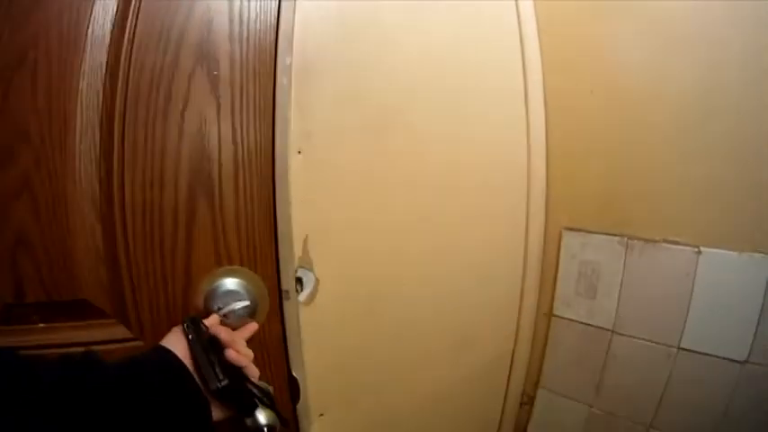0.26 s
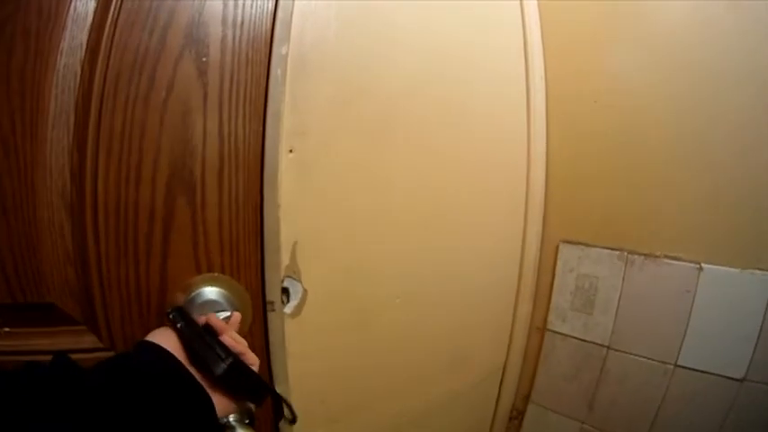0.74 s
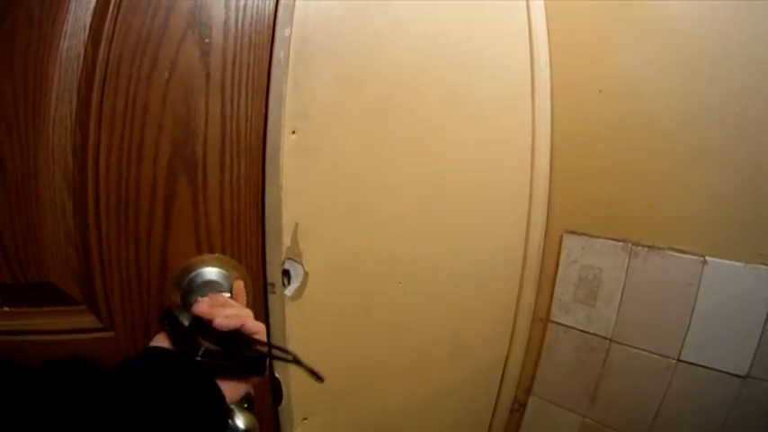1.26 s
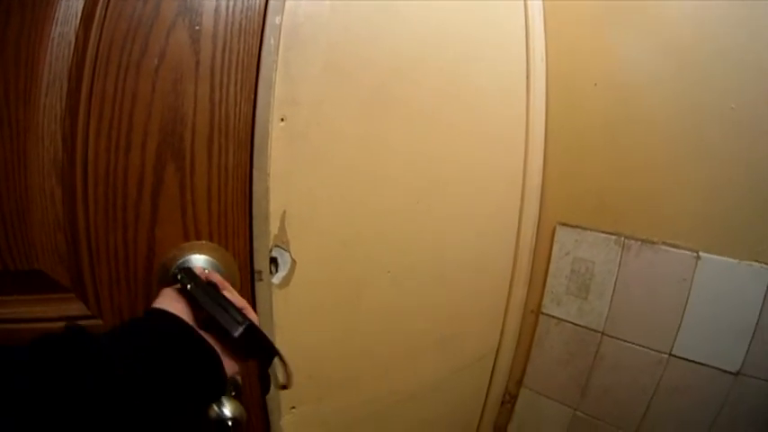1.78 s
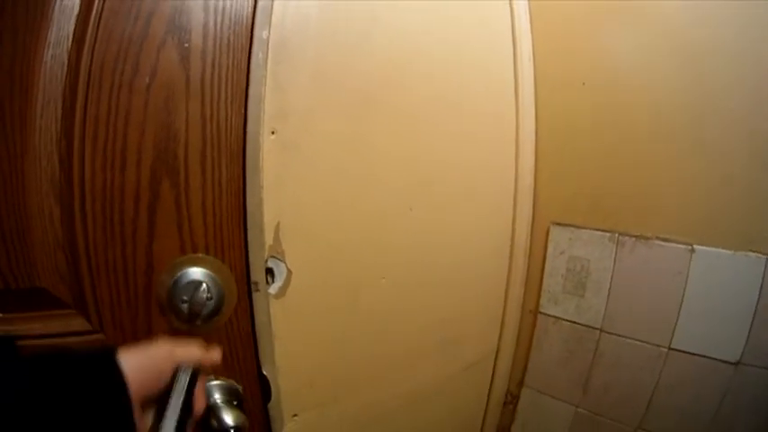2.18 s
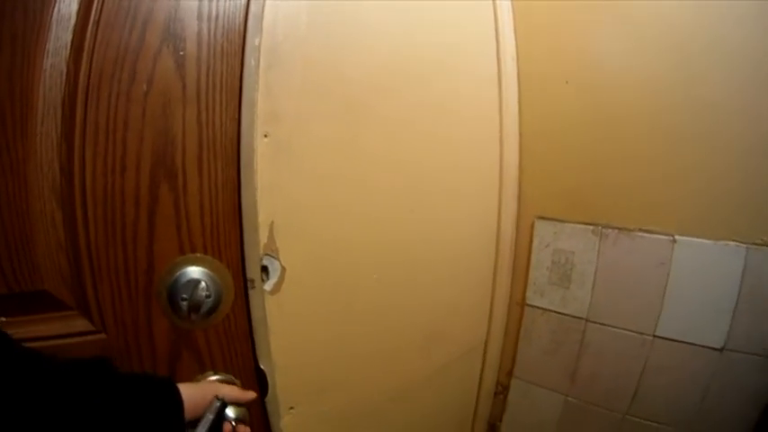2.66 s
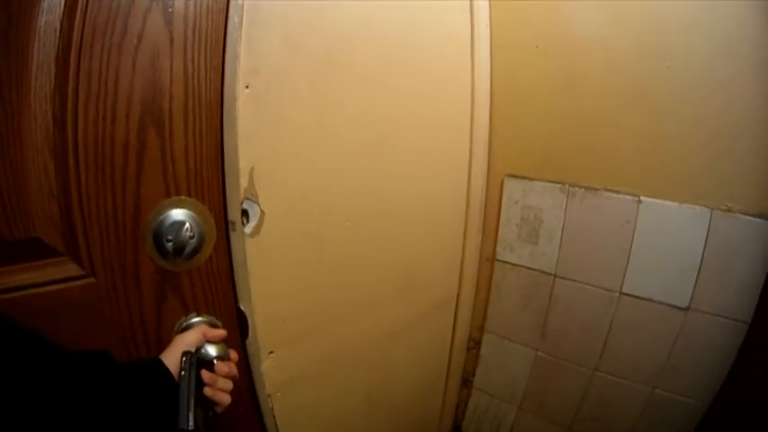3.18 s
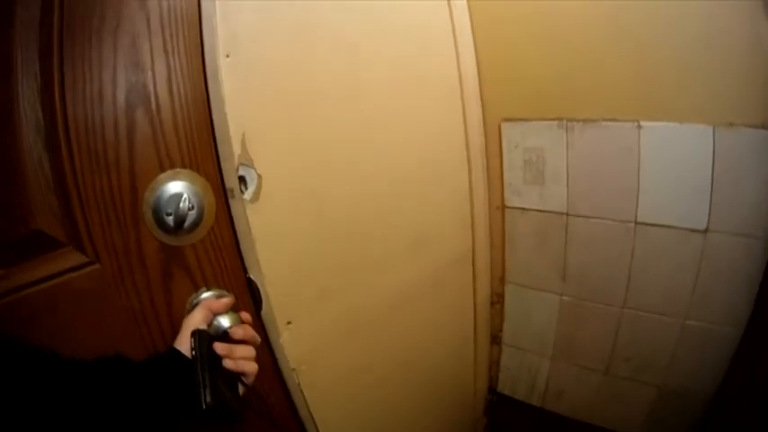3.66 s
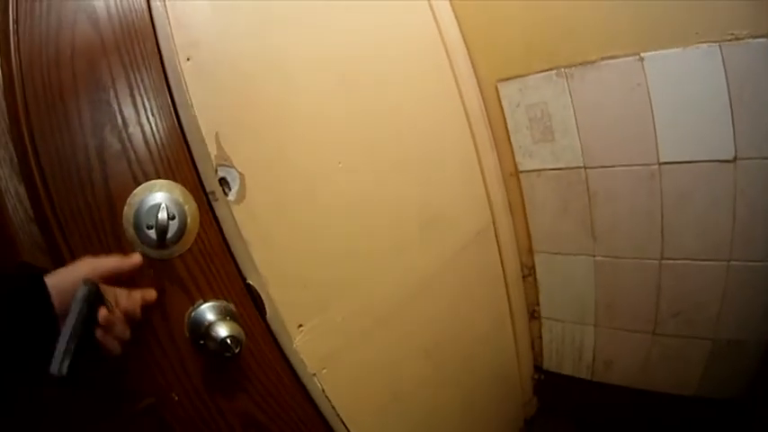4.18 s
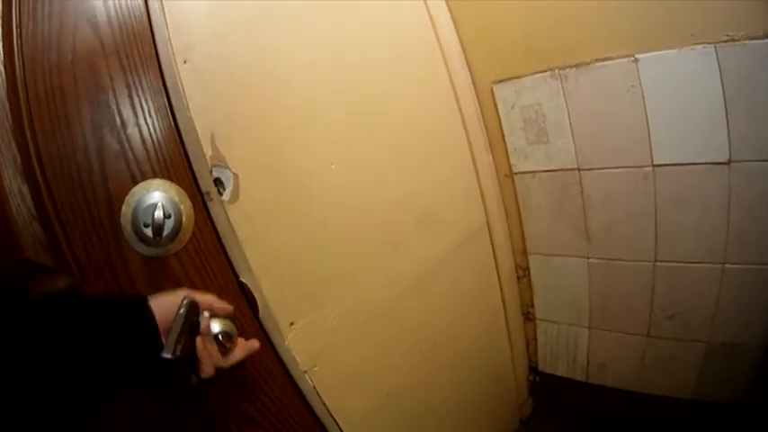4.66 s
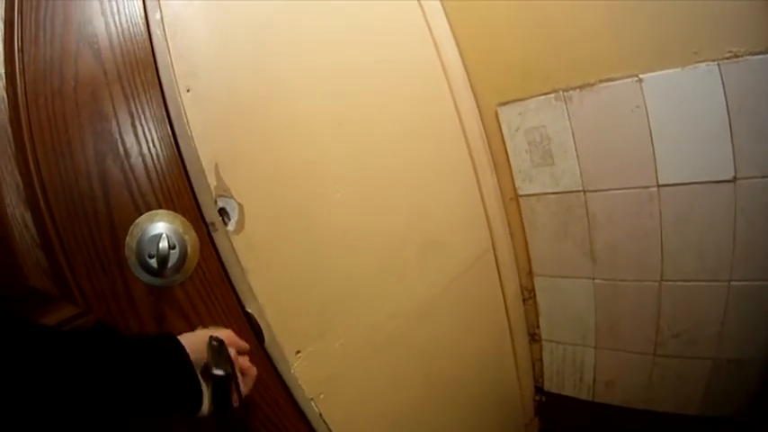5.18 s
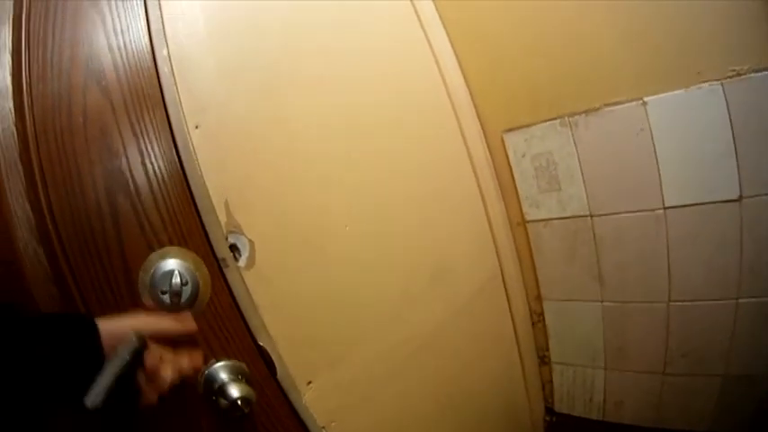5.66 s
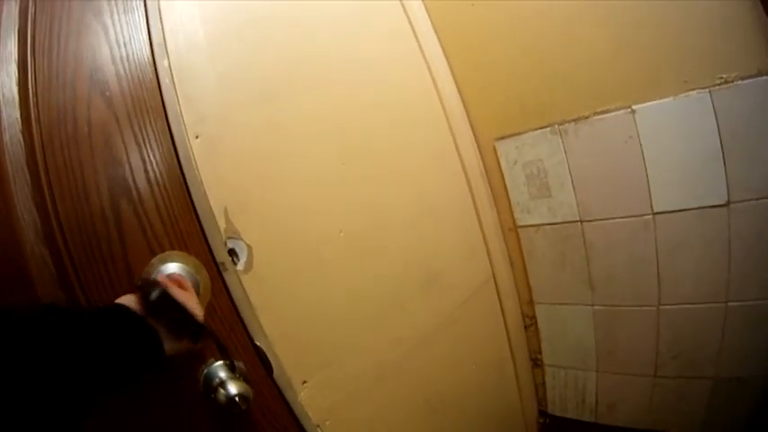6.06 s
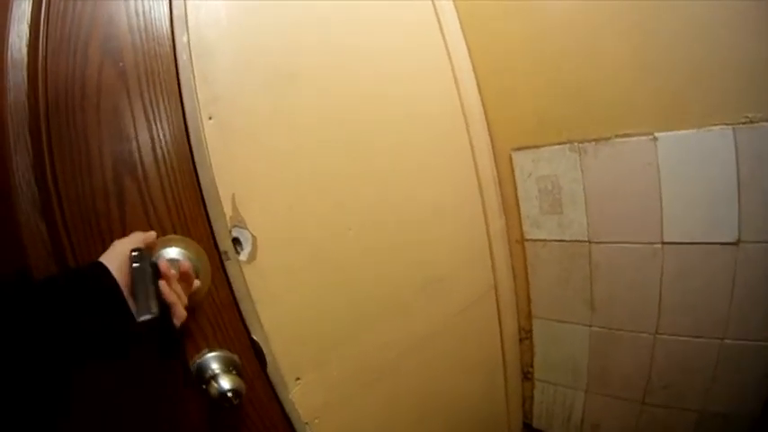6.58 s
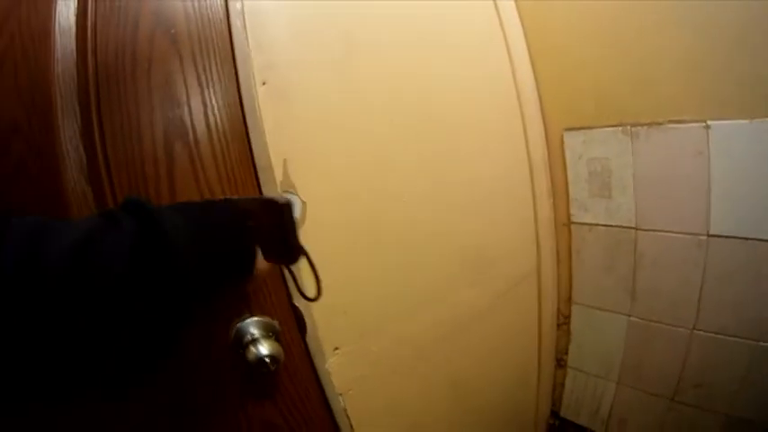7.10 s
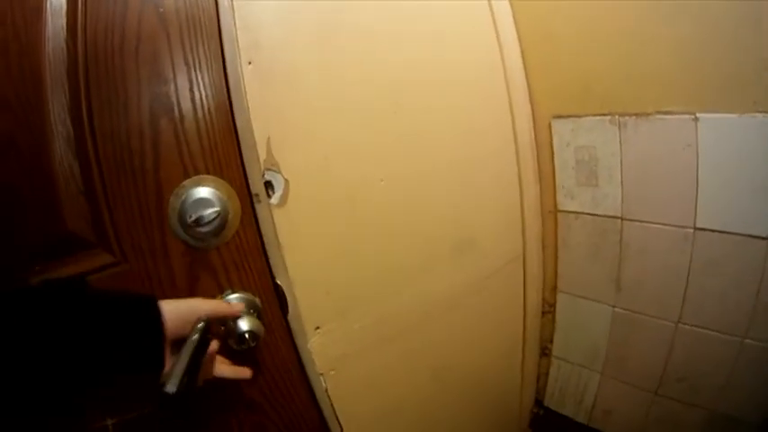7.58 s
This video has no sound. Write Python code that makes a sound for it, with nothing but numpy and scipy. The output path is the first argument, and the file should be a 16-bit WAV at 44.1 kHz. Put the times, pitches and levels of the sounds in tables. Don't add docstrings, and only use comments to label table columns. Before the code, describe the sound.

Metal lock parts tick, then clatter heavily against a wooden door. The doorknob follows with dull knocks and loose rattles, separated by quiet rubbing of hand, sleeve and strap. Small key clicks and scrapes lead to the loudest, sharp bolt snap, then a final knob clack. Short tile echoes, faint building rumble, a cheap close microphone with harsh, grainy treble.

```python
import sys
import numpy as np
from scipy import signal
from scipy.fft import rfft, irfft, next_fast_len
from scipy.io import wavfile
from scipy.ndimage import uniform_filter1d

SR = 44100
rng = np.random.default_rng(int(sys.argv[2]) if len(sys.argv) > 2 else 0)


def field_ratio(decibels):
    return 10 ** (np.asarray(decibels, dtype=float) / 20)


def to_wav(sig):
    pcm = np.clip(np.atleast_2d(sig), -1, 1) * 32767
    pcm = np.round(pcm).astype(np.int16)
    wavfile.write(sys.argv[1], SR, pcm.T)


N = 345303

# t/s, f/Hz, level/dB
MOTOR = [
    (0, 103, -56),
    (.5, 112, -53),
    (1.0, 116.5, -52.5),
    (1.15, 118, -46),
    (1.65, 122, -53.5),
    (1.9, 126, -75),
]
# t/s, level/dB
BUILDING = [(0, -42.5), (.2, -46), (.61, -42), (1.0, -44.5), (1.35, -43), (1.6, -43), (1.95, -40),
            (2.25, -45.5), (2.77, -42.5), (3.6, -43), (4.35, -43.5), (5.0, -43), (5.35, -44.5),
            (5.8, -41.5), (6.15, -40.5), (6.4, -42), (6.9, -39), (7.54, -42), (7.83, -41.5)]
# t/s, push on the leaf level/dB, hand and sleeve level/dB
HANDLING = [(0, -53, -42.5), (.17, -57.5, -53), (.5, -50, -45.5), (.76, -56.5, -55.5), (1.4, -56, -57),
            (2.11, -51.5, -50.5), (2.28, -58, -57), (2.9, -50.5, -51), (3.5, -50, -53.5), (4.4, -58, -56.5),
            (5.0, -51, -55), (5.3, -47.5, -54), (5.45, -56.5, -56.5), (6.001, -58.5, -56.5),
            (6.35, -51, -49.5), (6.65, -61, -59.5), (6.85, -51.5, -49.5), (7.3, -59, -59)]
# f/Hz, density/dB
RUMBLE_SPECTRUM = [(12, -38), (18, -5), (26, 3), (36, -4.5), (77, -1.5), (110, -13), (200, -25.5),
                   (400, -48.5)]
CREAK_SPECTRUM = [(100, -18.5), (200, 3.5), (300, 4.5), (500, 0.5), (900, -11.5), (1600, -32)]
RUSTLE_SPECTRUM = [(300, -4.5), (700, -2.5), (1040, -2.5), (1300, 1), (1640, -6.5), (2600, -9), (4500, -13),
                   (7000, -8.5)]
# level below the contact/dB, time to the top/s
LEAF_SHAKE = (-9, 0.027)
TRIM_SHAKE = (-18, 0.04)
WALL_SHAKE = (-15, 0.056)
# f/Hz, density/dB
STRAP_SPECTRUM = [(900, -33), (1210, -15), (1290, 9), (1380, -16), (1900, -14)]
# t/s, length/s, level/dB
STRAP_RUBS = [
    (-.1, 0.3, -62),
    (.3, 0.68, -74),
    (1.85, 0.64, -67),
    (2.7, 0.78, -78),
    (5.13, 0.2, -59),
    (6.1, 0.25, -65),
    (6.7, 0.29, -63),
]
# f/Hz, density/dB
SCRAPE_SPECTRUM = [(1500, -22), (2200, 4), (3300, 0), (4200, -7), (5000, 7), (5600, 4), (7000, -17)]
# t/s, length/s, level/dB
SCRAPES = [
    (6.207, 0.07, -55.5),
    (6.716, 0.256, -58),
]
# t/s, length/s, f/Hz, level/dB
SQUEAKS = [
    (.338, .024, 4880, -54),
    (.416, .015, 4830, -47),
    (.429, .03, 4860, -53),
    (7.65, .028, 1185, -58),
]
# f/Hz, t60/s
HALL_DECAY = [(100, 0.32), (400, 0.47), (1200, 0.24), (3000, 0.21), (6000, 0.23)]
# f/Hz, level/dB, t60/s
DOOR_MODES = [(76, 1, 0.062), (120, -13, 0.23), (155.4, -7.5, 0.6), (214, -2.5, 0.27), (278.2, 3.5, 0.048),
              (307.7, -5, 0.16), (365, -12.5, 0.28), (402.2, -4.5, 0.17), (500, -11.5, 0.15),
              (579, -10, 0.13)]
# low f/Hz, high f/Hz, hump f/Hz, hump width/Hz, hump level/dB
LOCK_CASE = (1360, 2780, 2100, 380, 4.7)
PINS = (2570, 7700, 4320, 1760, 2.6)
KNOB = (437, 1390, 720, 290, 1.6)
# f/Hz, width/Hz, level/dB
PLATE_MODES = [(958, 60, -6.5), (1131, 41, -6.5), (1406, 35, -3.5), (1992, 39, -7), (2425, 70, -4.5),
               (2730, 82, -11.5), (3380, 79, -16.5), (4330, 87, -12.5), (4740, 71, -16.5)]
# t/s, blow level/dB, door thump level/dB, brightness/dB
FIRST_TURN = [(.001, -71, -64, -3), (.4174, -53.5, -72, 6.5), (.5012, -49.5, -47, -12),
              (.5328, -59, -63, -8), (.5745, -44, -63, -5), (.6764, -50.5, -53.5, -4.5),
              (.842, -58, -51.5, -11.5), (1.2843, -54, -66, -9.5), (1.4085, -50.5, -71, -1.5),
              (1.454, -53, -46.5, -2), (1.5143, -54, -39, -6), (1.5314, -33.5, -40.5, -3.5),
              (1.6429, -32, -64, -3.5), (1.6698, -50, -32, -17.5), (1.7647, -30, -25, 0),
              (1.7776, -25.5, -23.5, -1), (1.7933, -26, -32, 0.8), (1.8101, -44, -35, 6),
              (2.0753, -48, -68, -6.5)]
# t/s, blow level/dB, door thump level/dB, brightness/dB
KNOB_STOPS = [(2.461, -53, -42, -15), (2.6029, -32, -31, -7.5), (2.7496, -41.5, -30, -10),
              (2.8498, -52.5, -48, -6), (2.9063, -57.5, -42, 3.5), (2.9485, -64, -39.5, -12),
              (3.23, -61, -47, -3), (3.582, -56.5, -51, -6), (3.8567, -37.5, -46.5, -6),
              (3.8797, -43.5, -41.5, -4), (4.513, -40, -40.5, -6.5), (4.5975, -59, -57, -6),
              (4.6156, -54.5, -46, -5), (4.8478, -47.5, -37, -10), (4.8975, -46.5, -34, -5.5),
              (5.006, -61, -56, -6), (5.0174, -60, -41, -1), (5.5289, -45, -49, -5),
              (5.5405, -38, -36.5, -8.5), (7.753, -30.5, -29.5, -3), (7.785, -51, -33, 6.5)]
# t/s, blow level/dB, door thump level/dB, brightness/dB
SECOND_TURN = [(6.098, -54.5, -52, -4.5), (6.1691, -50.5, -53, -7), (6.302, -41, -69, 0.5),
               (6.3253, -38.5, -54, 0), (6.443, -64, -61, -12), (6.544, -45.5, -56, -0.5),
               (6.6296, -57, -57, -9), (6.745, -57.5, -59, -10), (6.8766, -62, -34.5, -1),
               (6.9506, -32, -52, -1), (6.972, -35, -33, 4), (7.0157, -34, -25, 3.5),
               (7.0258, -20.5, -27, 2.5), (7.045, -35, -29, -11.5), (7.3176, -60, -54.5, -3)]
# t/s, blow level/dB, door thump level/dB, brightness/dB
SLIDES = [
    (.402, -48, -60, -7.5),
    (2.6193, -43, -29.5, -6),
    (3.724, -53, -63, 0.5),
    (4.954, -50.5, -50, -11),
    (5.4984, -52, -46, -2),
    (6.343, -63, -53, 10),
    (7.349, -56.5, -54, -2.5),
]
# t/s, blow level/dB, door thump level/dB, brightness/dB
NUDGES = [
    (.036, -56, -42, -14.5),
    (1.598, -42.5, -45, -2),
    (3.99, -49.5, -40, -6),
    (4.71, -51, -42, -6.5),
    (4.992, -46, -39.5, -4.5),
    (6.428, -56.5, -51.5, -4.5),
]
# chatter t60/s, rise/s, first blow level over the chatter/dB
FIRST_KIND = (0.14, 0.0015, 4.5)
KNOB_KIND = (0.13, 0.0032, 7.8)
SECOND_KIND = (.13, 0.0019, 4.4)
SLIDE_KIND = (0.3, 0.0024, 11)
NUDGE_KIND = (0.17, 0.015, -7)
# t/s, level/dB, f/Hz, t60/s
RINGS = [(.506, -30, 645, 0.033), (.534, -32, 680, 0.032), (1.288, -35.5, 690, 0.032),
         (1.463, -37.5, 715, 0.041), (1.765, -14.5, 108, 0.24), (1.771, -23, 76, 0.35),
         (2.138, -44, 750, 0.058), (2.463, -41, 308, 0.13), (2.465, -35.5, 644, 0.076),
         (2.752, -38, 618, 0.24), (2.765, -36, 791, 0.1), (2.77, -31, 482, 0.1),
         (2.93, -35, 269, .15), (4.9, -33, 76, 0.62), (4.905, -22, 515, 0.046),
         (5.542, -27.5, 776, 0.079), (5.558, -26, 745, 0.035), (7.04, -24, 153, 0.25),
         (7.355, -46, 750, 0.051), (7.757, -27.5, 1042, 0.05),
         (.04, -43, 321, 0.16), (.042, -40, 426, 0.079), (1.79, -21.5, 156.8, 0.48),
              (2.63, -42, 219.4, 0.69), (2.946, -39, 219, 0.28), (3.77, -41, 214, 0.46),
              (4.515, -32.5, 257, 0.13), (4.729, -45, 214, 0.55), (4.999, -37, 214, 0.4),
              (5.435, -45, 342, 0.22), (7.051, -29, 214, 0.42),
         (.4194, -37, 2460, .025), (1.409, -36.5, 2450, 0.034), (1.41, -49, 4830, 0.06),
               (1.533, -29, 2044, 0.074), (1.644, -29.5, 4340, .022), (3.859, -29.5, 3000, 0.023),
               (4.517, -27, 2550, 0.015), (5.545, -35.5, 2960, .044), (6.546, -45, 4970, 0.086),
               (6.547, -39, 3710, 0.027), (6.552, -46, 2044, 0.15), (6.327, -35, 2400, 0.026),
               (7.349, -47, 2590, .04), (7.35, -48, 4750, 0.044), (7.35, -55, 3900, 0.035),
         (.445, -44, 1060, .08), (.579, -42, 689, .07), (.62, -47, 689, .07),
              (0.681, -40.5, 1270, 0.042), (.714, -47, 1270, .05), (1.289, -44, 1321, .05),
              (1.458, -45, 1390, 0.065), (1.538, -40, 754, .1), (1.66, -33, 574, .08),
              (1.794, -23, 810, 0.085), (1.794, -23, 584, 0.08), (1.794, -23, 1422, .1),
              (1.797, -20.5, 281, 0.074), (2.078, -46, 1200, 0.11), (2.47, -47, 1180, .08),
              (2.63, -24, 433, .08), (2.85, -53, 1141, .07), (2.94, -40, 820, 0.051), (3.6, -50, 795, 0.13),
              (3.935, -41.5, 876, 0.077), (3.957, -42, 280, .1), (3.957, -46, 495, 0.095),
              (4.015, -41, 808, 0.087), (4.513, -28.5, 523, 0.034), (4.515, -48, 1110, 0.074),
              (4.72, -43, 800, 0.054), (4.85, -43, 1150, 0.043), (4.898, -36, 1110, .05),
              (5.56, -34, 1013, .08), (6.165, -44, 388, .08), (6.326, -53, 760, 0.063),
              (6.442, -47, 873, 0.077), (6.443, -45, 1230, 0.067), (6.878, -39, 540, 0.11),
              (2.49, -42, 597, .15), (2.612, -29, 1100, 0.09), (1.77, -18.5, 105, 0.13),
              (3.806, -37, 213, .12), (6.96, -31, 1177, .1), (6.977, -29, 277, .1),
              (7.038, -22.5, 1127, 0.1), (7.039, -17, 295, 0.082), (7.077, -23, 192, .1),
              (2.652, -28, 208, .1), (4.538, -34, 255, .1), (4.68, -43.5, 228, .2), (5.045, -38, 217, 0.16),
              (6.9, -48, 500, 0.1), (2.775, -33, 229, 0.11), (1.68, -34, 310, 0.097),
              (1.769, -23, 342, 0.089),
         (0.58, -41, 2490, .05), (1.456, -53, 2850, 0.035), (1.532, -37, 2871, .04),
           (1.657, -35, 1600, 0.045), (1.66, -33, 2900, 0.043), (1.766, -23, 5280, 0.034),
           (1.792, -24, 3350, 0.042), (1.806, -25, 2020, 0.046), (1.818, -29, 3560, 0.042),
           (1.839, -38, 3430, 0.046), (2.634, -34, 1970, .04), (2.676, -41, 1952, .04),
           (2.751, -35, 2125, 0.033), (3.857, -30.5, 2360, .05), (4.535, -39, 2330, .07),
           (4.558, -41, 1630, .04), (4.599, -45, 2300, 0.044), (4.896, -40, 1650, .03),
           (4.897, -42, 3618, 0.024), (6.327, -38, 5400, .03), (6.433, -43.5, 2080, .07),
           (6.56, -45, 4881, .06), (6.972, -25, 1560, .03), (7.016, -31, 3180, .03),
           (7.03, -21, 2010, 0.073), (7.06, -34, 4460, .05), (7.089, -35, 3290, 0.063),
           (7.755, -30, 2420, .05), (7.785, -36, 4140, .04)]
# t/s, level/dB, f/Hz
SNAPS = [(1.4076, -46, 3600), (3.726, -37, 4310), (3.726, -33.5, 2870), (2.604, -20.5, 2830),
         (4.899, -44, 2670), (6.302, -21.5, 4140), (6.326, -22.5, 3130), (6.326, -24, 4270),
         (6.9725, -15, 2260), (7.026, -1.5, 2380), (7.026, -5, 4050)]
# t/s, level/dB
TICKS = [(0.5, -38), (.5752, -35), (.6772, -40), (1.4555, -38), (2.0762, -38), (2.143, -33.5), (2.605, -20),
         (2.7495, -27), (2.907, -39), (4.7166, -37), (4.848, -39), (4.8973, -25), (6.544, -32),
         (7.0271, -7), (1.5315, -30), (3.857, -24), (1.7648, -14), (1.8, -7), (1.806, -10), (4.095, -42),
         (2.57, -48), (6.4445, -48)]
# f/Hz, level/dB
ANTI_ALIAS = [(20, -1), (4600, 3.5), (5200, 0.5), (5600, -4), (6000, -8), (6300, -61)]


def evened(x):
    return x / np.sqrt(np.mean(x ** 2) + 1e-20)


def opening(x, db):
    return field_ratio(db) * x / np.sqrt(np.mean(x[:SR // 50] ** 2))


def read(points, hz):
    f, value = np.transpose(points)
    return np.interp(np.log(hz + 1), np.log(f + 1), value)


def add(mix, s, sound):
    part = mix[round(s * SR):][:len(sound)]
    part += sound[:len(part)]


def murmur(spectrum, patchy_db, flicker_db, size=1024):
    frames, hz = 4 * N // size + 5, np.fft.rfftfreq(size, 1 / SR)
    a, b, patches = rng.standard_normal((frames, len(hz), 3)).T
    flicker = evened(uniform_filter1d(rng.standard_normal(frames), 4))
    patches = uniform_filter1d(patches, 8, axis=0)
    patches = evened(uniform_filter1d(patches, 10, axis=1))
    level_db = read(spectrum, hz)[:, None] + patchy_db * patches + flicker_db * flicker
    z = (a + 1j * b) * field_ratio(level_db)
    return evened(signal.istft(z, nperseg=size, noverlap=3 * size // 4)[1][:N])


def strokes(rows, edge_s):
    t, gain = np.arange(N) / SR, np.zeros(N)
    for s, length, db in rows:
        inside_s = np.minimum(t - s, s + length - t)
        gain += field_ratio(db) * np.clip(inside_s / edge_s, 0, 1)
    return gain


def contacts():
    kinds = ((FIRST_TURN, FIRST_KIND), (KNOB_STOPS, KNOB_KIND), (SECOND_TURN, SECOND_KIND),
             (SLIDES, SLIDE_KIND), (NUDGES, NUDGE_KIND))
    return [(*row, *kind) for rows, kind in kinds for row in rows]


def shaken(rest_db, shake, column):
    below_db, top_s = shake
    power = field_ratio(2 * rest_db)
    u = np.arange(SR // 2) / SR / top_s
    for row in contacts():
        swell = field_ratio(row[column] + below_db) * u * np.exp(1 - u)
        add(power, row[0], swell ** 2)
    return np.sqrt(power)


def door_leaf(chance, spread_db):
    hz, db, t60 = np.transpose(DOOR_MODES)[:, :, None]
    level, start = chance.reshape(2, -1, 1)
    t = np.arange(SR // 3) / SR
    waves = np.sin(2 * np.pi * hz * t + 0.76 * start) * np.minimum(t / 0.0015, 1)
    return (field_ratio(db + spread_db * level - 60 * t / t60) * waves).sum(0)


def motor():
    s, hz, db = np.transpose(MOTOR)
    t = np.arange(N) / SR
    waver = evened(uniform_filter1d(rng.standard_normal(N), 3000))
    turns = np.cumsum(np.interp(t, s, hz) * (1 + 0.015 * waver)) / SR
    return field_ratio(np.interp(t, s, db) + 1.8 * waver[::-1]) * np.sin(2 * np.pi * turns)


def building_rumble():
    rest_db = np.interp(np.arange(N) / SR, *np.transpose(BUILDING))
    rumble = murmur(RUMBLE_SPECTRUM, patchy_db=1.5, flicker_db=-0.8, size=4096)
    return shaken(rest_db, WALL_SHAKE, column=2) * rumble


def handling():
    s, *levels = np.transpose(HANDLING)
    push_db, sleeve_db = (np.interp(np.arange(N) / SR, s, level) for level in levels)
    creak = murmur(CREAK_SPECTRUM, patchy_db=0.5, flicker_db=2.0)
    response = door_leaf(np.zeros(2 * len(DOOR_MODES)), spread_db=0)
    leaf = evened(signal.fftconvolve(creak, response)[:N])
    creak = shaken(push_db, LEAF_SHAKE, column=2) * evened(creak + 0.4 * leaf)
    rustle = murmur(RUSTLE_SPECTRUM, patchy_db=-1.5, flicker_db=1.0)
    return creak + shaken(sleeve_db, TRIM_SHAKE, column=1) * rustle


def strap():
    gain = field_ratio(-84) + strokes(STRAP_RUBS, edge_s=0.046)
    return gain * murmur(STRAP_SPECTRUM, patchy_db=2.5, flicker_db=3.5)


def key_scrape():
    noise = murmur(SCRAPE_SPECTRUM, patchy_db=0.5, flicker_db=0.0, size=256)
    return strokes(SCRAPES, edge_s=0.032) * noise


def squeaks():
    out = np.zeros(N)
    for s, length, hz, db in SQUEAKS:
        waver = evened(uniform_filter1d(rng.standard_normal(4000), 150))[:round(length * SR)]
        tone = np.sin(2 * np.pi * np.cumsum(hz * (1 + .008 * waver)) / SR)
        add(out, s, field_ratio(db + 2 * waver[::-1]) * tone * signal.windows.tukey(len(tone), .7))
    return out


def hallway(x, first_s):
    taps = np.zeros(SR // 2)
    at = np.arange(0, len(taps) - 20, 20)
    at = at + rng.integers(0, 20, len(at))
    taps[at] = rng.choice([-1., 1.], len(at))
    hz, t, z = signal.stft(taps, SR, nperseg=256)
    decay = field_ratio(-60 * t / read(HALL_DECAY, hz)[:, None])
    tail = signal.istft(z * decay, SR, nperseg=256)[1]
    tail = np.r_[np.zeros(round(first_s * SR)), tail / np.linalg.norm(tail)]
    return signal.fftconvolve(x, tail)[:N]


def dense(part, drive):
    low_hz, high_hz, hump_hz, width_hz, hump_db = part
    band = signal.butter(3, [low_hz, high_hz], "bandpass", fs=SR, output="sos")
    passed = signal.sosfilt(band, drive)
    hump = signal.lfilter(*signal.iirpeak(hump_hz, hump_hz / width_hz, SR), passed)
    return passed + field_ratio(hump_db) * hump


def plates(x):
    out = x.copy()
    for hz, width_hz, db in PLATE_MODES:
        out += field_ratio(db) * signal.lfilter(*signal.iirpeak(hz, hz / width_hz, SR), x)
    return out


def contact(row, chance, chatter):
    s, blow_db, door_db, bright_db, t60, rise_s, first_db = row
    t = np.arange(len(chatter)) / SR
    blow = field_ratio(first_db - 60 * t / 0.012)
    loose = field_ratio(-60 * (t / t60) ** 1.34)
    drive = chatter * (blow + loose) * np.minimum(t / rise_s, 1)
    metal = opening(dense(LOCK_CASE, drive), blow_db - 4.0)
    metal += opening(dense(PINS, drive), blow_db + bright_db - 3.0)
    metal += opening(dense(KNOB, drive), blow_db - bright_db - 8.5)
    push = drive * field_ratio(-60 * t / (0.013 + rise_s))
    thump = signal.fftconvolve(door_leaf(chance, spread_db=3.0), push)
    return metal, opening(thump, door_db - 3.0)


def struck_contacts():
    metal, doors = np.zeros((2, N))
    for row in contacts():
        chance = rng.standard_normal(2 * len(DOOR_MODES))
        grain = rng.exponential(1, 400).repeat(20)
        chatter = rng.standard_normal(8000) * field_ratio(1.2 * np.minimum(grain, 3.2))
        clack, thump = contact(row, chance, chatter)
        add(metal, row[0], clack)
        add(doors, row[0], thump)
    return doors + plates(metal)


def rings():
    out, t = np.zeros(N), np.arange(SR // 2) / SR
    snaps = [(*row, 0.0083) for row in SNAPS]
    for s, db, hz, t60 in RINGS + snaps:
        rise = np.minimum(t * hz / 0.93, 1)
        add(out, s, field_ratio(db - 60 * t / t60) * np.sin(2 * np.pi * hz * t) * rise)
    return out


def ticks():
    out = np.zeros(N)
    u = np.arange(200) / SR / .00005
    for s, db in TICKS:
        add(out, s, field_ratio(db) * np.e * u * (2 - u) * np.exp(-u))
    return out


def lock_and_knob():
    return struck_contacts() + rings() + ticks()


def scene():
    background = motor() + building_rumble()
    close = handling() + strap() + key_scrape() + squeaks()
    lock = lock_and_knob()
    return (background + close + lock + field_ratio(-8) * hallway(lock, first_s=.003))[None]


def roll_off(x):
    return signal.sosfilt(signal.butter(12, 16480, fs=SR, output="sos"), x)


def record(dry):
    size = next_fast_len(N + SR)
    gain = field_ratio(read(ANTI_ALIAS, np.fft.rfftfreq(size, 1 / SR)))
    soft = irfft(rfft(dry[0], size) * gain, size)
    soft = .95 * np.tanh(soft / .95)
    held = np.repeat(signal.resample_poly(soft, 40, 147, window=("kaiser", 2)), 4)
    back = signal.resample_poly(held, 147, 160)[1:N + 1]
    edge = signal.firwin(401, 15300, window=("kaiser", 5), fs=SR)
    return roll_off(signal.oaconvolve(back, edge, "same")[None])


dry = scene()
out = record(dry)
to_wav(out)
```